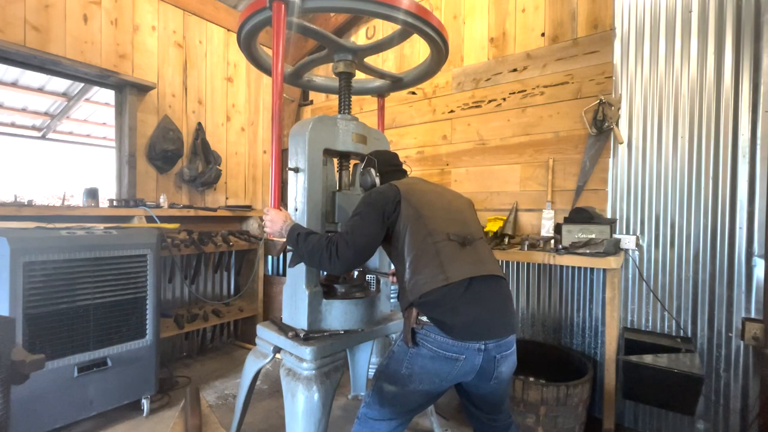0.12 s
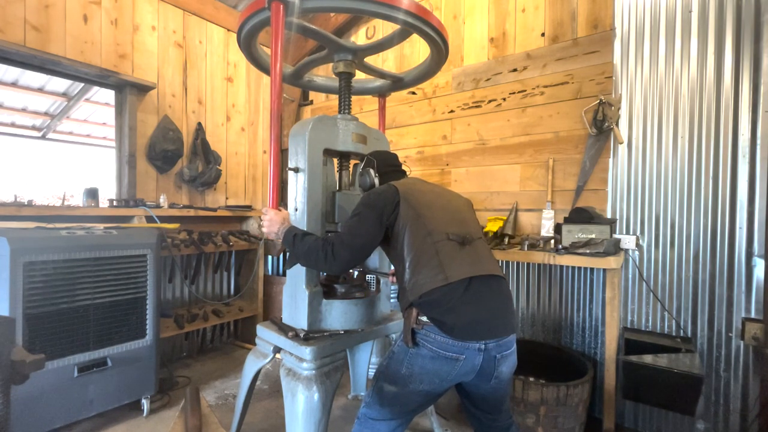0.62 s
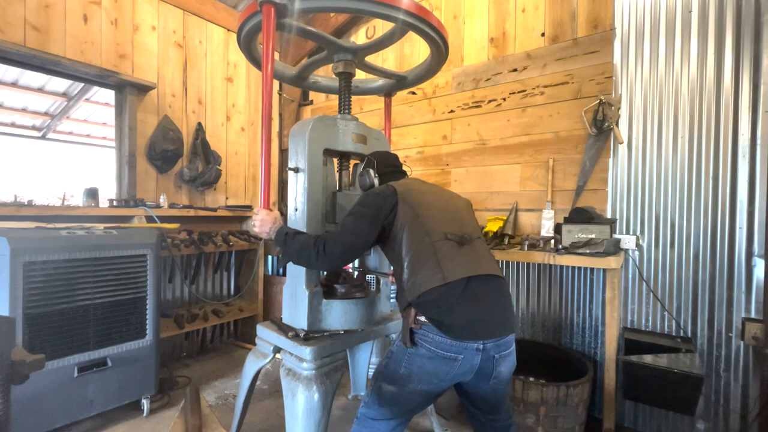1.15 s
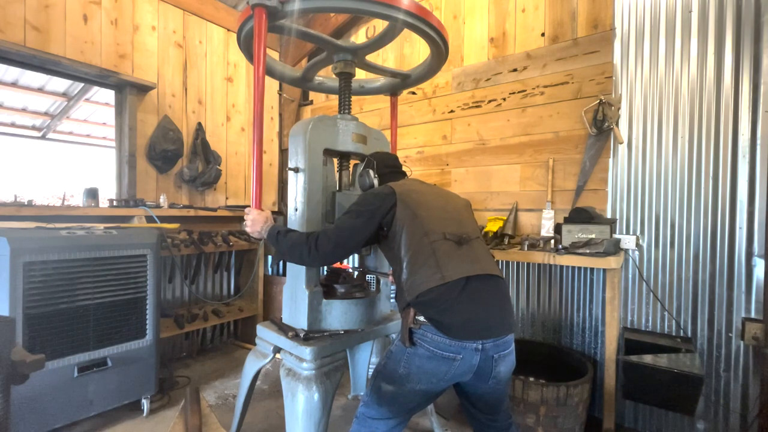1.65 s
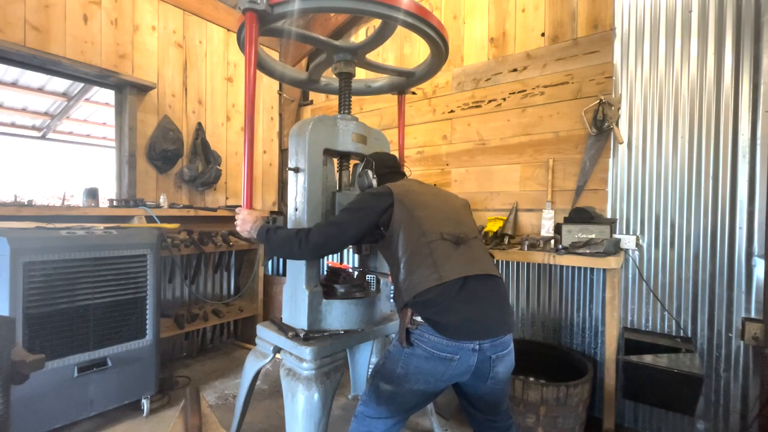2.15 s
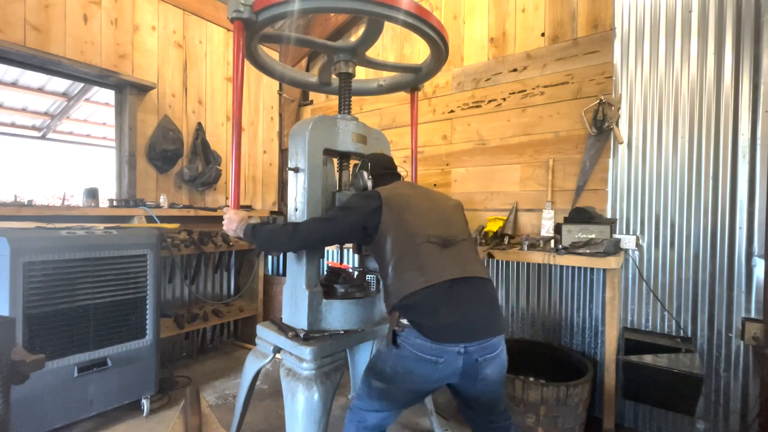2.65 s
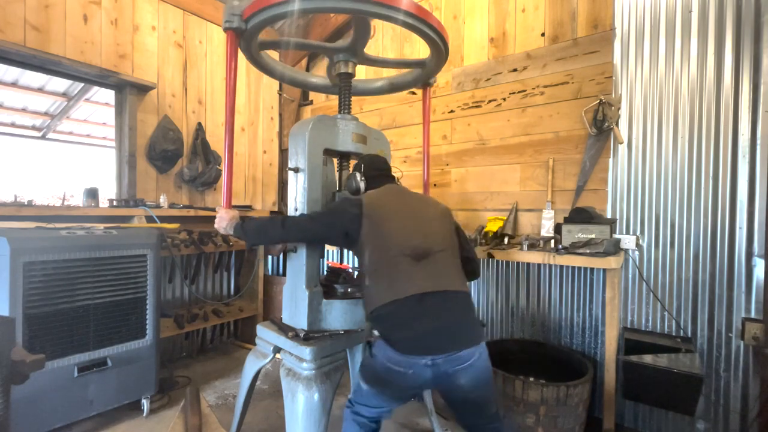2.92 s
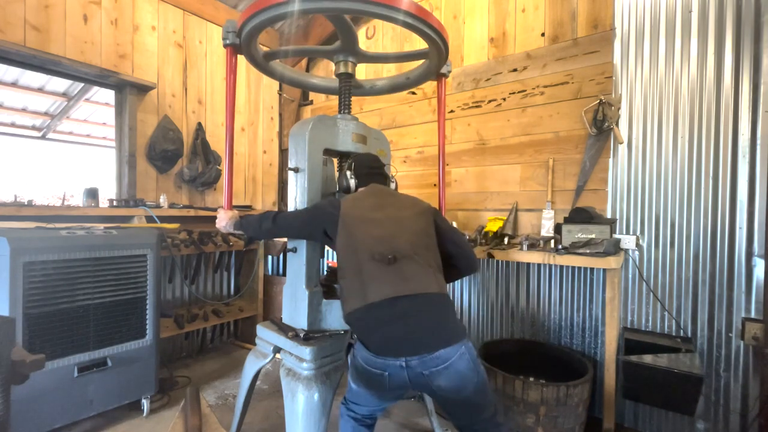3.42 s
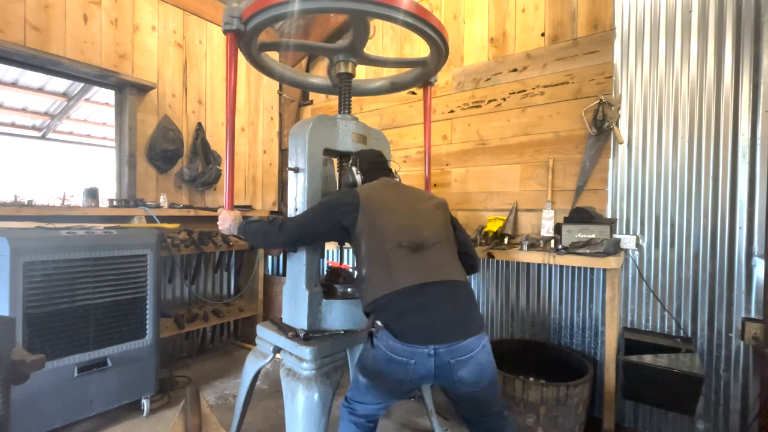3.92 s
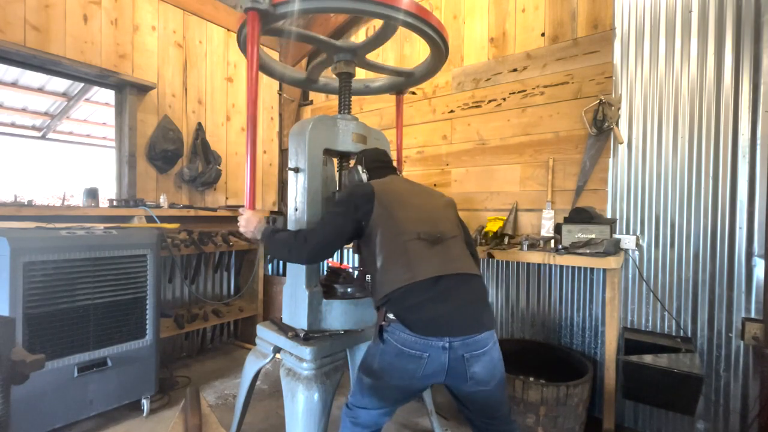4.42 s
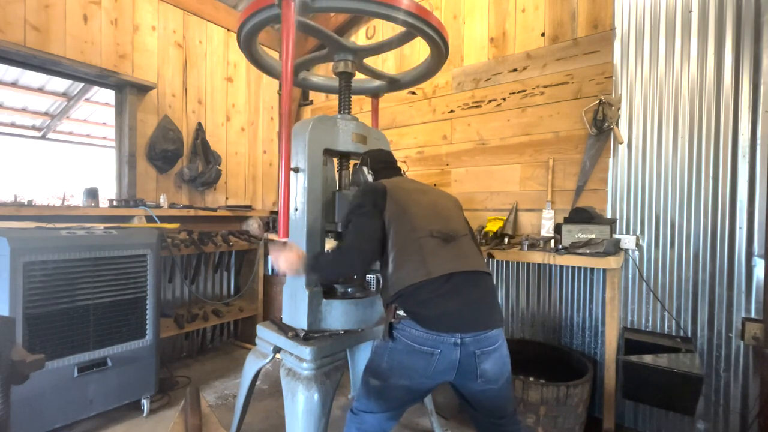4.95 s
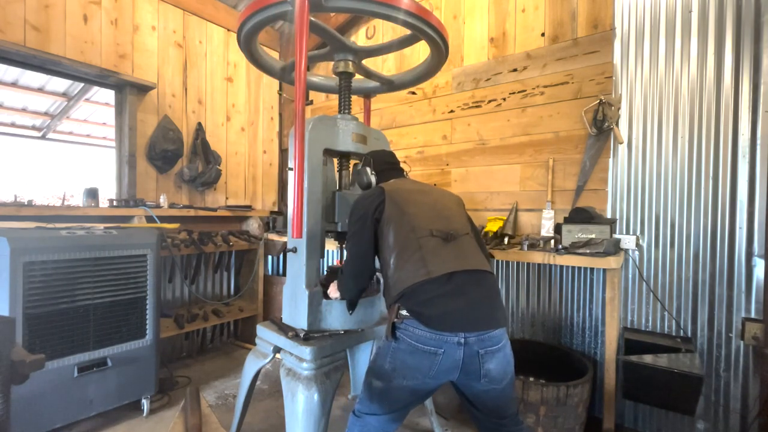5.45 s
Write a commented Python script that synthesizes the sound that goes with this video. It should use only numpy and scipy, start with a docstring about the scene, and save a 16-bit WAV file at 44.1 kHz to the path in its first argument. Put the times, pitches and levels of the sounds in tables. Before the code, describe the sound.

A stereo room microphone hears a continuous, breathy low furnace roar with uneven bass, plus a softer, high gas hiss leaning left that gently surges. Scattered dry ticks barely poke through from about two seconds on. Nothing else stands out until about five and a half seconds, when a steel tool grates on the press die and strikes it with a bright clank, rattling bounces and a short shed echo.

```python
"""In a wood and sheet-metal workshop, a forge burner roars steadily, heard in stereo.
The roar is noise lifted at the resonances of firebox and shed; the level of its low noise wanders slowly.
On the left the gas jet hisses and flutters as grainy noise.
Short noise ticks sound in the treble, the last ones with the scrape.
Near the end, at a hand screw press, a steel tool scrapes along the die as gritty noise and clangs down:
contact noise and decaying steel modes, then softer bounces; the shed rings after it."""
import sys
import numpy as np
from scipy import signal
from scipy.fft import rfft, irfft, next_fast_len
from scipy.io import wavfile
from scipy.ndimage import uniform_filter1d, minimum_filter1d, map_coordinates

SR = 44100
rng = np.random.default_rng(int(sys.argv[2]) if len(sys.argv) > 2 else 0)


def ratio(d):
    """dB to gain"""
    e = np.asarray(d, float) / 20
    return 10 ** e


def put_to_file(sound):
    """Save the sound as 16-bit audio at rate SR, in the file named by the first command-line argument."""
    columns = np.atleast_2d(sound).T  # one column per channel
    safe = np.clip(columns, -1, 1)
    whole_steps = np.round(safe * 32767)
    wavfile.write(sys.argv[1], SR, whole_steps.astype(np.int16))


N = 245637  # samples


def unit(x):
    """Scaled to rms 1."""
    return x / np.sqrt(np.mean(x ** 2) + 1e-20)


def along(points, hz, column=1):
    """A column of (Hz, ..) points read on a log axis."""
    table = np.transpose(points)
    return np.interp(np.log(hz + 1), np.log(table[0] + 1), table[column])


def curves(rows):
    """One value per sample for each column after the time."""
    s, *columns = np.transpose(rows)
    return [np.interp(np.arange(N) / SR, s, column) for column in columns]


def wobble(rate):
    """A smooth random curve, rate knots a second."""
    knots = rng.standard_normal(int(N * rate / SR) + 4)
    return map_coordinates(knots, [np.arange(N) * rate / SR])


def filtered(x, response):
    """x times a complex response of frequency."""
    size = next_fast_len(N + SR // 2)
    return irfft(rfft(x, size) * response(np.fft.rfftfreq(size, 1 / SR)), size)[..., :N]


def low_passed(x, corner_hz):
    """The part below the corner, without phase shift."""
    return filtered(x, lambda hz: 1 / (1 + (hz / corner_hz) ** 8))


def coloured(x, points):
    """x with the spectrum of a (Hz, dB) table, scaled to rms 1."""
    return unit(filtered(x, lambda hz: ratio(along(points, hz))))


def patchy(patchy_db):
    """Two white noises sharing patches of random gain in time and frequency."""
    z = signal.stft(rng.standard_normal((2, N)), nperseg=512)[2]
    field = uniform_filter1d(rng.standard_normal(z.shape[1:]), size=8, axis=0)
    field = uniform_filter1d(field, size=10, axis=1)
    return signal.istft(z * ratio(patchy_db * unit(field)), nperseg=512)[1][:, :N]


# stereo image by frequency, left and right opposed near 10 kHz: freq_hz [Hz],
# likeness of left and right [0-1], left_lead [rad], left_over_right_db [dB, before lean scales it]
STEREO_IMAGE = [(60, .99, -.1, 1.5), (250, .96, -.15, .8), (400, .72, -.4, -1.2), (700, .36, -.1, .5),
                (1100, .83, -.4, .3), (2000, .57, -.9, 3), (3000, .45, -1.1, 2.4), (3600, .45, .1, 1.8),
                (4300, .27, -.3, 1.8), (4500, .28, -.4, 9), (5300, .3, -.9, 9), (6400, .4, -.6, 8.2),
                (6900, .35, -3, 9.2), (7400, .44, -5.1, 7.5), (8300, .4, -4.5, 8.4), (9200, .35, -7, 1.4),
                (9750, .9, -9, .3), (9900, .9995, -9.42, 0), (10400, .9995, -9.43, 0),
                (10900, .75, -10, .3), (11300, .5, -11.8, .4), (11700, .9, -12.5, .3)]


def placed(pair, lean):
    """Phase and level differences of left and right; lean scales the level difference."""
    def half(hz):
        level = ratio(lean * along(STEREO_IMAGE, hz, column=3) / 2)
        return level * np.exp(.5j * along(STEREO_IMAGE, hz, column=2))
    return filtered(pair, lambda hz: np.array([half(hz), 1 / half(hz)]))


def heard(pair, lean):
    """A shared and an opposed signal, mixed to the likeness of left and right, then placed."""
    def turn(hz):
        return np.arccos(np.clip(along(STEREO_IMAGE, hz), 0, 1)) / 2
    mid, side = filtered(pair, lambda hz: np.array([np.cos(turn(hz)), np.sin(turn(hz))]))
    return placed(np.array([mid + side, mid - side]), lean)


# slow level wander of the low noise: time_s [s], bass_db [dB, level of the bass noise at that time],
# body_db [dB, level of the body noise at that time]
LOW_NOISE_LEVEL = [(0, -31.5, -27.5), (.45, -34.5, -26.5), (.95, -24, -27), (1.4, -27.5, -26.5),
                   (1.8, -30, -28), (2.3, -25, -27.5), (2.8, -29, -25), (3.2, -28.5, -29),
                   (3.7, -34.5, -26), (4.1, -28.5, -26.5), (4.5, -30, -27.5), (4.85, -26, -26),
                   (5.2, -29.5, -28), (5.57, -32, -25)]
# roar between its resonances: freq_hz [Hz], level_db [dB per Hz, relative]
ROAR_COLOUR = [(20, -62), (30, -44), (48, -8), (100, -6), (200, -6), (330, -8.5), (480, -11.5), (750, -18),
               (1100, -17), (1400, -24), (2000, -26.5), (2450, -34), (2750, -33), (3400, -41),
               (4200, -46.5), (6000, -65)]
# resonances of firebox and shed: centre_hz [Hz], width_hz [Hz], lift_db [dB]
RESONANCES = [(53.8, 18, 10), (71.6, 6.2, 9.5), (105, 8, 6.5), (148.6, 12.2, 11.5), (189, 13.3, 6.5),
              (227.5, 7.6, 2), (255.8, 29, 9.5), (295, 11, 6.5), (335, 8.9, 2), (385, 3.4, 4.5),
              (425.7, 35.8, 13), (410, 31, 0.5), (495, 17, 3.5), (553, 17, 7), (614, 15, 7), (686, 21, 6.5),
              (794, 27, 1.5), (837, 29, 6.5), (877.5, 17.4, 8.5), (904, 33, 2.5), (1030, 29, 4.5),
              (1100, 50, 3.5), (1177, 91, 3), (1251, 31, 1), (1306, 52, 4), (1467, 7.7, 1), (1508, 21, 2.5),
              (1736, 21, 5.5), (1700, 36, 3), (1995, 16, 2), (2120, 11, 3), (2565, 100, 3.5),
              (2750, 75, 4.5), (3686, 180, 5.5)]


def roar():
    """Flame turbulence: noise lifted at every resonance, its bass and body levels wandering slowly."""
    top_db, rumble_db = -34, -34  # steady levels above the body and below the bass
    bass_db, body_db = curves(LOW_NOISE_LEVEL)
    knots = rng.standard_normal(SR // 24)

    def response(hz):
        lift_db = sum(lift / (1 + (2 * (hz - centre) / width) ** 2) for centre, width, lift in RESONANCES)
        # crowded high room modes: random ripple with knots 11 Hz apart
        dense_db = 2.3 * np.clip(hz / 1400, 0, 1) * map_coordinates(knots, [hz / 11])
        return ratio(along(ROAR_COLOUR, hz) + lift_db + dense_db)

    flame = heard(filtered(patchy(patchy_db=0.96), response), lean=1)
    below_body_top = low_passed(flame, 480)
    below_bass_top = low_passed(flame, 195)
    rumble = low_passed(flame, 120)
    top = ratio(top_db) * unit(flame - below_body_top)
    body = ratio(body_db) * unit(below_body_top - below_bass_top)
    bass = ratio(bass_db) * unit(below_bass_top - rumble)
    return top + body + bass + ratio(rumble_db) * unit(rumble)


# colour of the gas jet: freq_hz [Hz], level_db [dB per Hz, relative]
HISS_COLOUR = [(3000, -16.5), (4300, -11), (4900, -7.5), (5350, 0), (5800, -5.5), (7000, -4), (8100, -5),
               (9200, -9), (9800, -5), (10700, -2), (11100, -9.5), (11400, -3), (11750, -22), (12000, -60)]


def jet():
    """Gas hiss that flutters and surges evenly, ever less, with a random spit of soft grains."""
    hiss_db = -51  # rms before flutter
    surge_per_s, surge_db, first_surge_s, surge_fade_s = 2.7, 0.9, 0.12, 4.6
    grains_per_s = 150
    grain_db = np.minimum(3.5 * rng.exponential(size=N), 9)
    spit = (rng.random(N) < grains_per_s / SR) * ratio(grain_db)
    grains = signal.lfilter([1], [1, -.97], spit)  # each grain is a puff of about a millisecond
    air = filtered(patchy(patchy_db=1.5) * (1 + 0.24 * grains), lambda hz: ratio(along(HISS_COLOUR, hz)))
    t = np.arange(N) / SR
    surge = np.exp(-t / surge_fade_s) * np.cos(2 * np.pi * surge_per_s * (t - first_surge_s))
    flutter_db = surge_db * surge + 0.3 * wobble(9) + 0.3 * wobble(35)
    return ratio(hiss_db + flutter_db) * unit(heard(air, lean=0.88))


# short ticks in the treble, the last ones with the scrape: start_s [s],
# level_db [dB of the puff before its band filter], pitch_hz [Hz], t60_s [s]
TREBLE_TICKS = [(2.196, -32, 6500, 0.032), (2.741, -32, 7200, .02), (3.14, -44, 10300, .25),
                (3.195, -29, 11700, .05), (3.196, -33, 8200, .04), (3.199, -33, 6800, .05),
                (3.199, -40, 4200, .06), (3.2125, -40, 11000, 0.2), (3.222, -36, 5000, .04),
                (3.254, -36, 5400, .03), (3.955, -34, 7300, .02), (4.928, -32.5, 6100, .02),
                (5.029, -34, 6000, .02), (5.063, -33, 6800, .025), (5.39, -37, 6500, .03),
                (5.408, -38, 10500, .2)]


def ticks():
    """Each tick is a short noise puff, band-passed round its pitch."""
    out, t = np.zeros((2, N + SR)), np.arange(SR // 5) / SR
    for start_s, level_db, pitch_hz, t60_s in TREBLE_TICKS:
        edges_hz = [pitch_hz / 1.25, min(pitch_hz * 1.15, 11900)]
        band = signal.butter(3, edges_hz, "bandpass", fs=SR)
        envelope = ratio(-60 * t / t60_s) * (1 - np.exp(-t / 0.00091))
        puff = rng.standard_normal((2, len(t))) * envelope
        out[:, round(start_s * SR):][:, :len(t)] += ratio(level_db) * signal.lfilter(*band, puff)
    return heard(out[:, :N], lean=0.92)


# colour of the sliding grit: freq_hz [Hz], level_db [dB, relative]
GRIT_COLOUR = [(2000, -30), (3500, -7), (4500, -1), (5400, -1), (6200, 2), (7000, -6), (8000, -9),
               (8800, -4), (10000, -1), (11200, -2), (12300, -8), (13500, -60)]


def slide(blow_s):
    """Steel scraping on the die: uneven grit that bites, eases off and ends at the blow."""
    start_s, rise_s, stop_s = 5.365, .055, .004
    full_db, sag_db_per_s = -48, 45  # level at the end of the rise, and its loss
    now = np.arange(N) / SR
    grit = rng.standard_normal(N) * ratio(3.5 * wobble(350) + 1.5 * wobble(70))
    bite = np.clip((now - start_s) / rise_s, 0, 1) ** 2
    stop = np.exp(-np.maximum(now - blow_s, 0) / stop_s)
    sagging_db = full_db - sag_db_per_s * (now - start_s - rise_s)
    return ratio(sagging_db) * bite * stop * coloured(grit, GRIT_COLOUR)


# blow on the die, then its bounces: start_s [s], level_db [dB, scales ring and contact]
DIE_BLOWS = [(5.488, -36), (5.495, -41), (5.502, -45), (5.509, -46), (5.521, -43), (5.529, -46)]
# modes of steel tool and die: freq_hz [Hz], level_db [dB, relative], t60_s [s]
STEEL_MODES = [(1780, -9, .12), (2245, -5, .2), (2300, 0, .06), (2550, -6, .08), (2795, 1, .12),
               (3050, -8, .1), (3235, -4, .25), (3475, -4, .3), (3833, -7, .3), (4050, -12, .12),
               (4330, 0, .14), (4420, -6, .25), (4504, 4, .3), (4600, -4, .12), (4866, -12, .35),
               (5167, -6, .3), (5230, 0, .045), (5266, -13, .3), (5626, -11, .3), (5833, -14, .2),
               (6100, -5, .06), (6365, -13, .3), (7327, -13, .2), (8403, -15, .25), (8715, -3, .25),
               (8899, -7, .1), (9170, -18, .2), (10640, -10, .055), (10940, -5, .06), (11080, -14, .2),
               (11700, -17, .12), (12150, -24, .15)]
# scatter of the close partials round each mode, zero for the mode itself: scatter_hz [Hz]
PARTIAL_SCATTER_HZ = [0, 25, 50, 90, 140, 200]
# colour of steel contact noise: freq_hz [Hz], level_db [dB, relative]
CONTACT_COLOUR = [(900, -42), (1500, 7), (2300, 3), (2800, -14), (3700, -18), (4500, 4), (5300, -10),
                  (6100, 7), (7800, 1), (8900, -10), (10000, -14), (11000, -1), (12300, -26), (12800, -70),
                  (22000, -120)]
# colour of the first contact: freq_hz [Hz], level_db [dB, relative]
SNAP_COLOUR = [(700, -40), (1300, -9), (2300, 0), (3000, -8), (4300, -13), (6100, 0), (7500, -10),
               (8900, -1), (10000, 4), (11000, 4), (12400, -24), (13000, -58), (14800, -50), (15500, -37),
               (16500, -37), (22000, -90)]


def clang():
    """A blow with bounces: each a noise snap, a noise rattle and decaying sines of the ringing steel."""
    ring_db, partial_db = -2, -12  # modes against the contact noise; close partials against their mode
    snap_db, snap_t60_s, rattle_db, rattle_t60_s, ring_rise_s = 14, .014, -5, .15, .002
    # bounces are softer contacts: they ring the steel less and more dully, and snap less
    bounce_ring_db, bounce_dulls_db_per_khz, bounce_snap_db = -9, .3, -13
    noise = coloured(rng.standard_normal(N), CONTACT_COLOUR)
    first_noise = coloured(rng.standard_normal(N), SNAP_COLOUR)
    out, t = np.zeros(N + SR), np.arange(SR // 2) / SR
    hz, mode_db, t60_s = np.transpose(STEEL_MODES)[:, :, None]
    scatter = rng.standard_normal((len(PARTIAL_SCATTER_HZ), len(STEEL_MODES), 1))
    split_hz = np.reshape(PARTIAL_SCATTER_HZ, (-1, 1, 1)) * scatter
    tones = np.sin(2 * np.pi * (hz + split_hz) * t) * (1 - np.exp(-t / ring_rise_s))
    for k, (start_s, level_db) in enumerate(DIE_BLOWS):
        bounce = k > 0
        strength_db = mode_db + rng.normal(0, 1.5, split_hz.shape) + partial_db * (split_hz != 0)
        dulling_db = bounce_dulls_db_per_khz * (hz - hz.min()) / 1000
        strength_db = strength_db + bounce * (bounce_ring_db - dulling_db)
        ring = (ratio(strength_db - 60 * t / t60_s) * tones).sum((0, 1))
        rattle_gain = ratio(rattle_db - 60 * t / rattle_t60_s + 4 * wobble(300)[:len(t)])
        rattle = rattle_gain * noise[k * SR // 2:][:len(t)]
        snap_gain = ratio(snap_db + bounce * bounce_snap_db - 60 * t / snap_t60_s)
        snap = snap_gain * (noise if bounce else first_noise)[k * SR // 3:][:len(t)]
        out[round(start_s * SR):][:len(t)] += ratio(level_db) * (ratio(ring_db) * ring + rattle + snap)
    return out[:N]


# decay of the shed: freq_hz [Hz], t60_s [s]
SHED_DECAY = [(500, 0.32), (4000, 0.38), (9000, 0.34), (12000, 0.11)]


def shed(x):
    """Convolution with a noise tail in which each frequency dies at its own speed."""
    hz, t, z = signal.stft(rng.standard_normal((2, SR // 2)), SR, nperseg=256)
    decay = ratio(-60 * t / along(SHED_DECAY, hz)[:, None])
    tail = signal.istft(z * decay, SR, nperseg=256)[1]
    delayed = np.pad(x, (150, 0))  # samples before the tail begins
    return signal.fftconvolve(delayed[None], tail / np.linalg.norm(tail[0]), axes=1)[:, :N]


def scene():
    """Roar, hiss, ticks and the tool with its room."""
    steel = slide(blow_s=DIE_BLOWS[0][0]) + clang()
    direct = placed(np.array([steel, steel]), lean=0.82)
    room = ratio(-4.0) * heard(shed(steel), lean=0.88)
    return roar() + jet() + ticks() + direct + room


def band_limit(x):
    """A steep low-pass at the top of the band."""
    return signal.sosfilt(signal.butter(12, 16800, fs=SR, output="sos"), x)


def record(dry):
    """A peak limiter whose gain dips, smoothed, around each peak above the ceiling."""
    ceiling, hold_s = .31, .012
    hold = round(hold_s * SR)
    need = np.minimum(1, ceiling / (np.abs(dry).max(0) + 1e-9))
    gain = uniform_filter1d(minimum_filter1d(need, 2 * hold), hold)
    return band_limit(dry * gain)


dry = scene()
out = record(dry)
put_to_file(out)
```